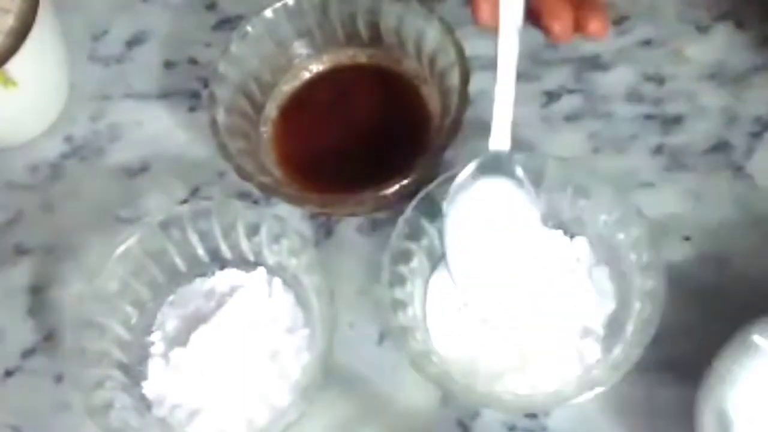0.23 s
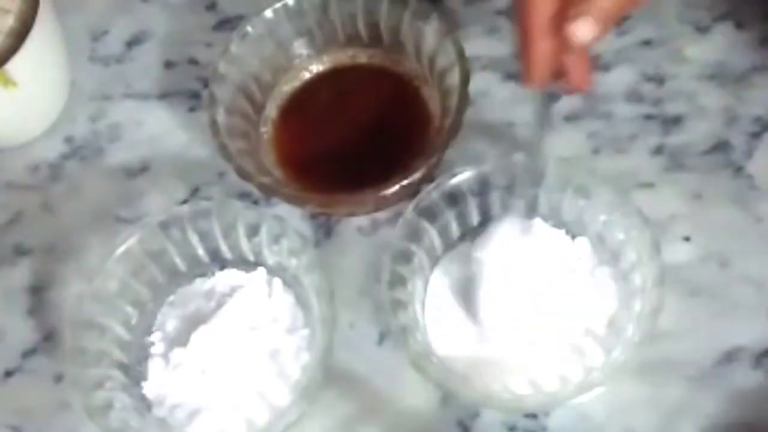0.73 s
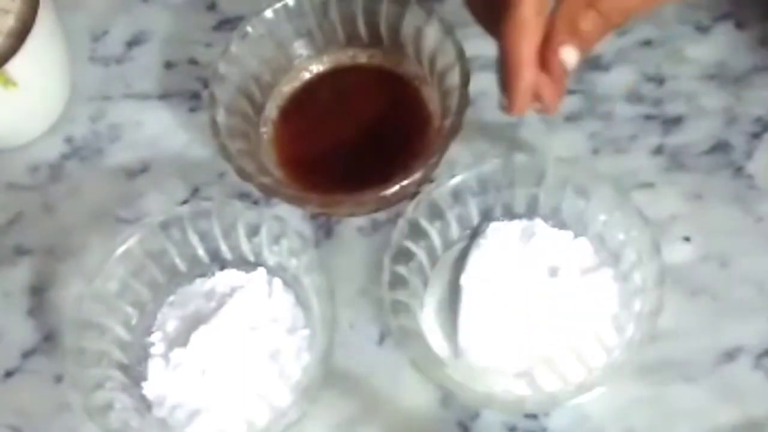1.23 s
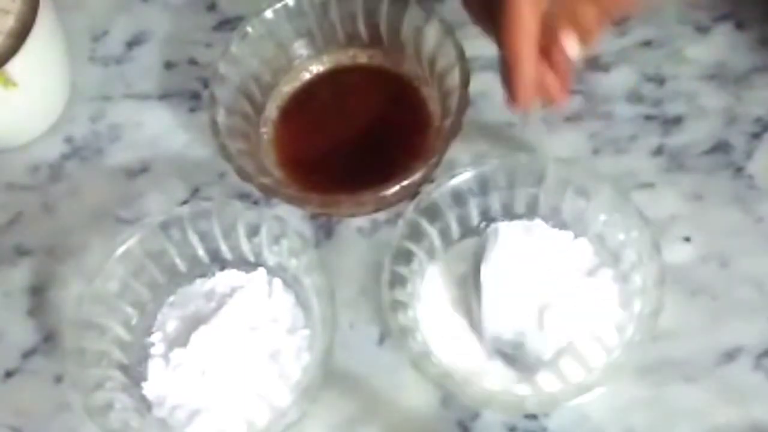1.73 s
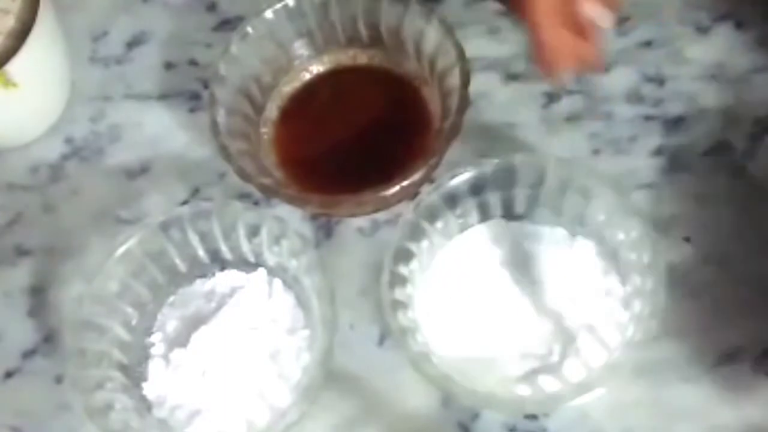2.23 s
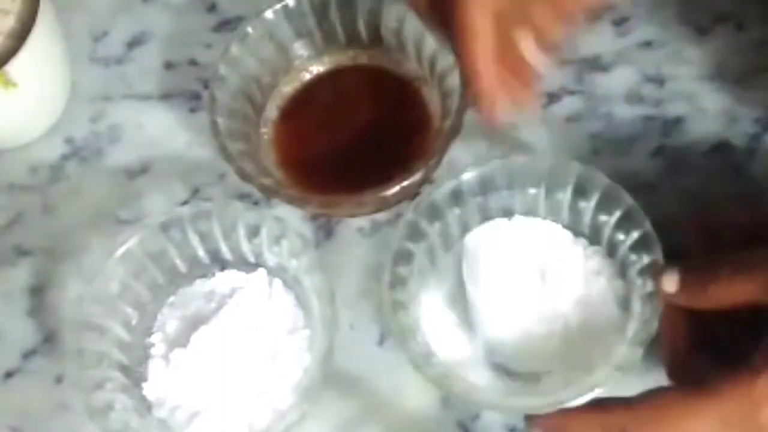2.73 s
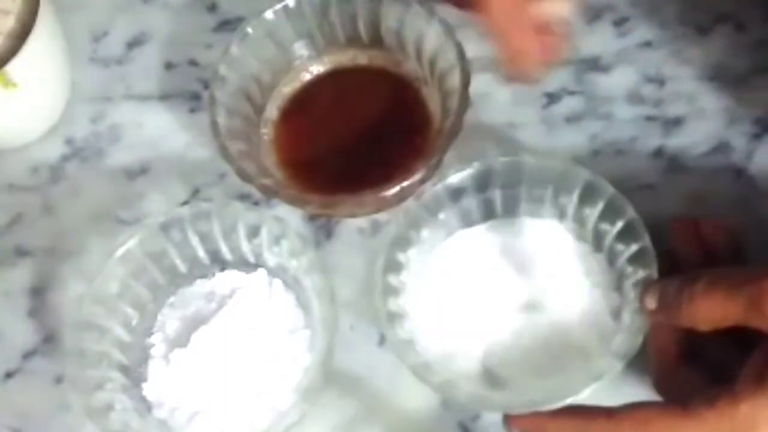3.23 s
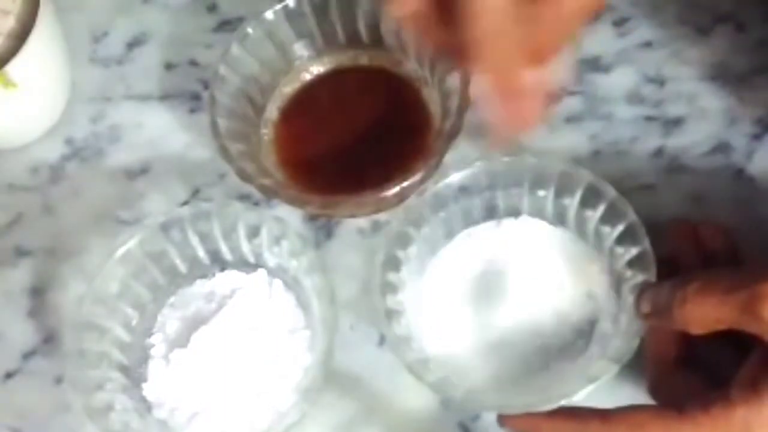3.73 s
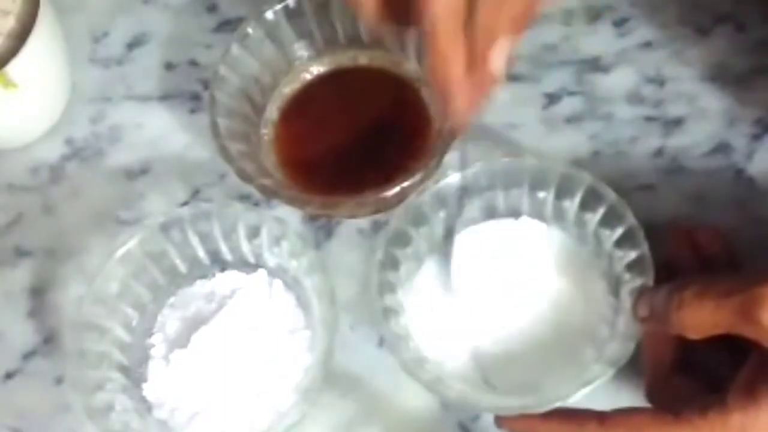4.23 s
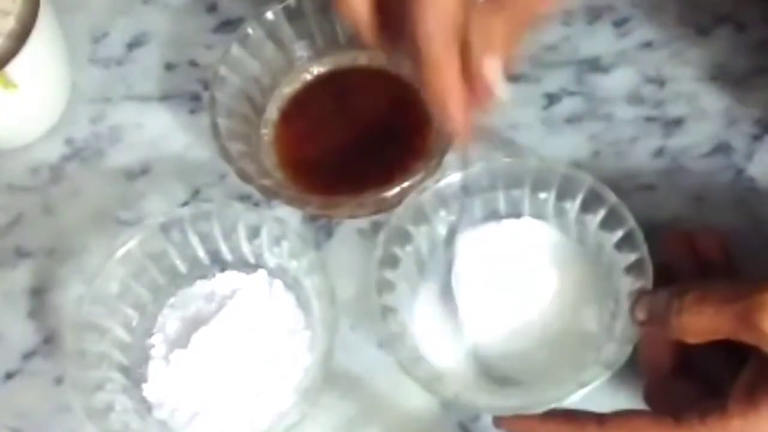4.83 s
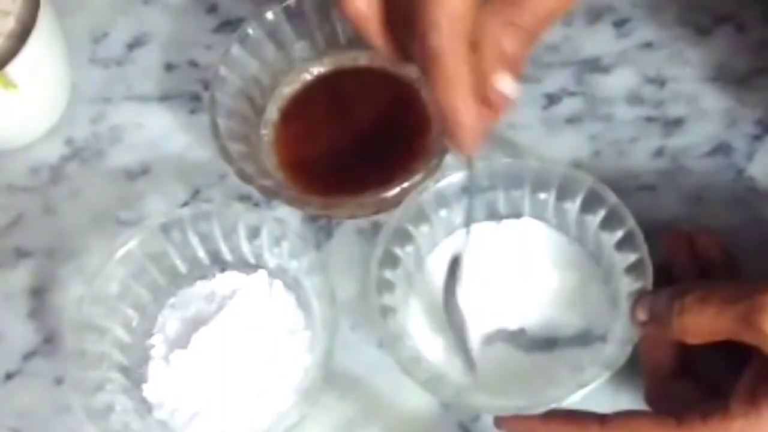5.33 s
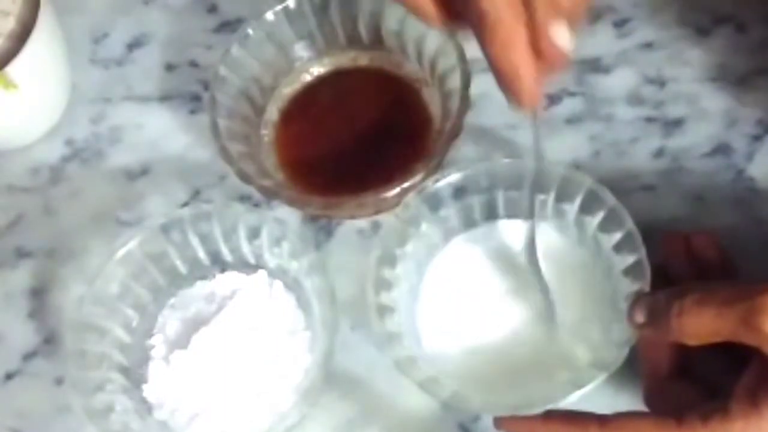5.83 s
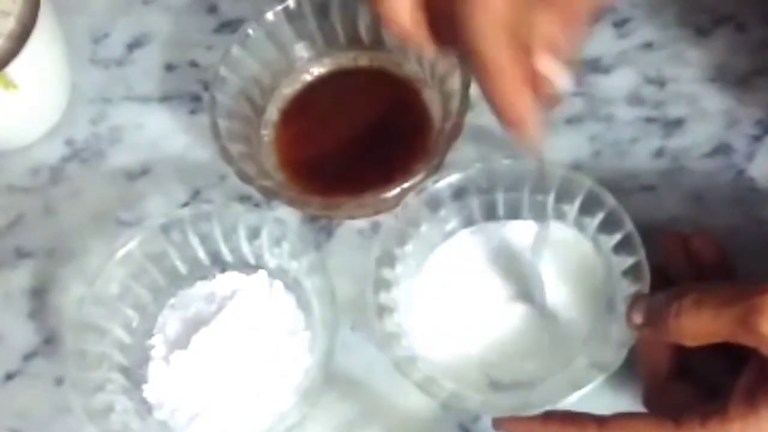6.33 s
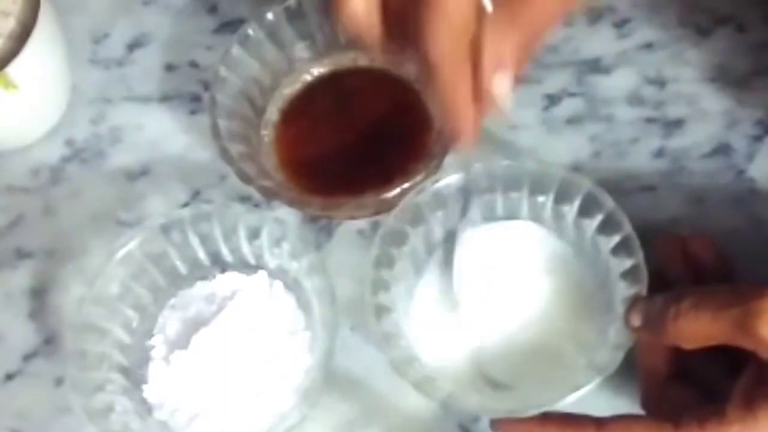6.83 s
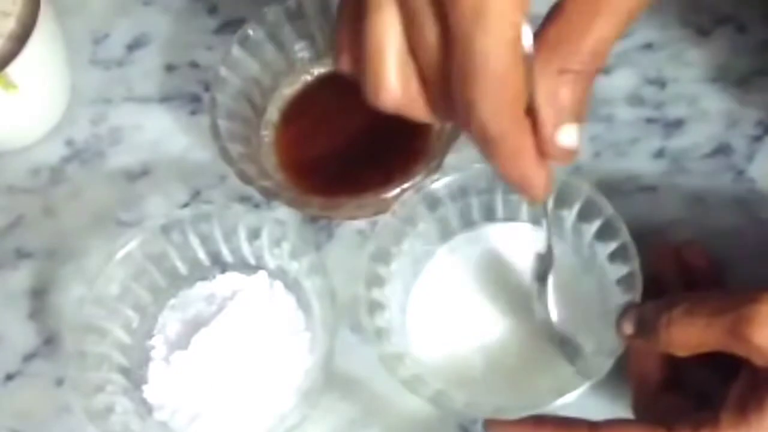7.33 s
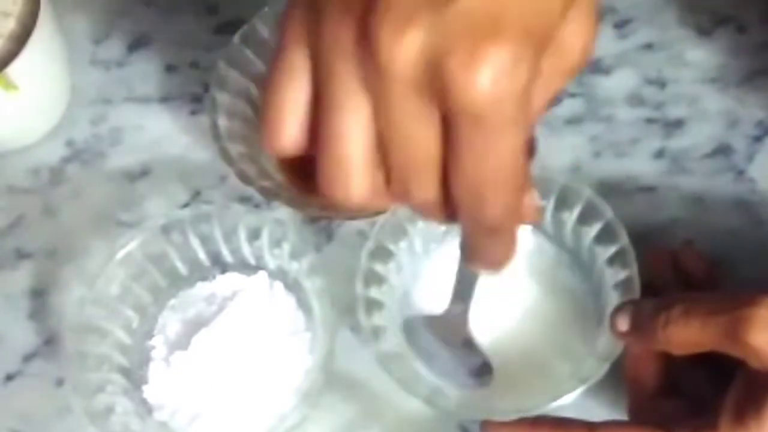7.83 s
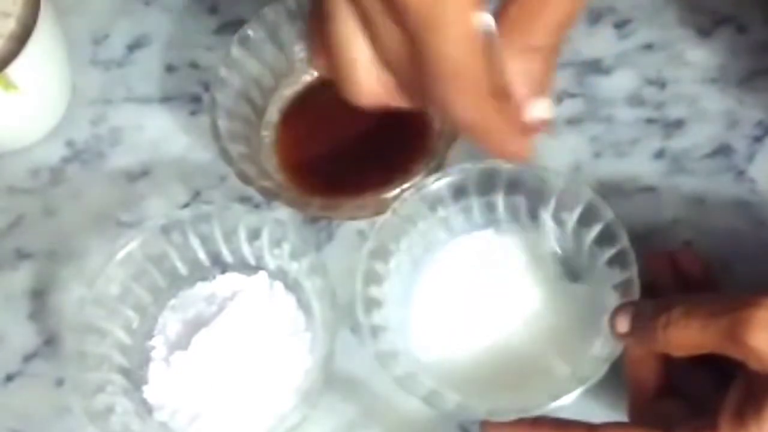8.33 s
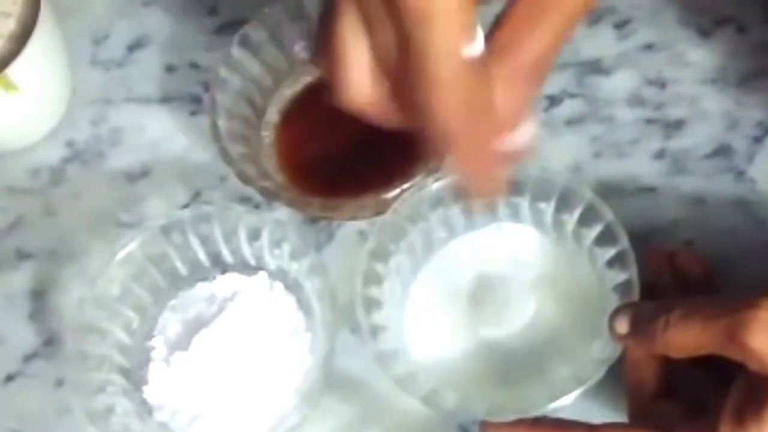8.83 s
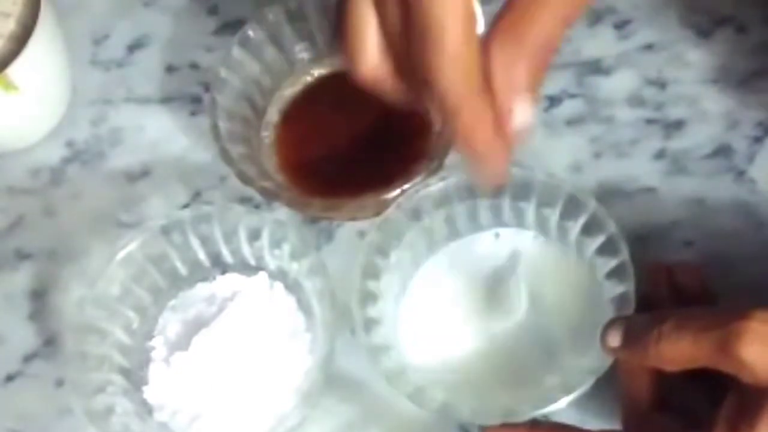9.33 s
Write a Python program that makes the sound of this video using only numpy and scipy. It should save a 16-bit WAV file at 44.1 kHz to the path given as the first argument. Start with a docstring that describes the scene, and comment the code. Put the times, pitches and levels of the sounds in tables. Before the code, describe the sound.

A metal spoon stirs thick paste in a small glass bowl, dull knocks and occasional bright clinks over a faint low hum in a kitchen.

```python
"""Stirring thick paste in a glass bowl

A steel spoon stirs a thick paste in a small glass bowl on a stone counter, in a small kitchen.
Blows on the bottom are damped low modes with a noisy splash; blows on the wall are a crack and ringing glass modes.
The drag of the spoon is clumped noise through the low modes; faint taps and bangle ticks are short bursts and rings.
Every hit gets a decaying-noise room answer. Filtered noise makes the rumble, wavering hum and hiss behind."""
import sys
import numpy as np
from scipy import signal
from scipy.fft import rfft, irfft, next_fast_len
from scipy.io import wavfile
from scipy.ndimage import map_coordinates

SR = 44100
rng = np.random.default_rng(int(sys.argv[2]) if len(sys.argv) > 2 else 0)


def voltage_ratio(decibels):
    """Convert decibels (scalar or array-like) to amplitude ratios, 20 dB per decade."""
    exponent = np.asarray(decibels, float) / 20
    return 10 ** exponent


def wrap_up_sound(samples):
    """Save the sound to the file named by the first command line argument, as 16-bit audio."""
    columns = np.atleast_2d(samples).T
    # keep every value between -1 and 1, then stretch to whole-number steps
    tamed = np.clip(columns, -1, 1)
    steps = np.round(tamed * 32767).astype(np.int16)
    wavfile.write(sys.argv[1], SR, steps)


N = 422478  # samples in the scene
HIT_LENGTH = 24576  # samples given to one hit with its room answer

# Level of the rumble before its lift and wobble: start_s, level_db
RUMBLE_LEVEL = [(0.0, -44.5), (0.69, -46.5), (1.47, -44.5), (2.35, -46), (3.71, -45.5), (4.05, -43.5),
                (6.27, -44), (6.88, -40.5), (7.6, -43.5), (7.95, -47), (9.28, -40.5), (9.58, -44.5)]
# Colour of the rumble, relative: pitch_hz, density_db (per Hz)
RUMBLE_COLOUR = [(15, -41), (30, 6.5), (70, 8), (108, -3), (162, 0.5), (208, -5), (270, -8.5), (400, -7.5),
                 (800, -38)]
# Unsteady hum tones, before they swell with the rumble: pitch_hz, width_hz, level_db
HUM_TONES = [(78.85, 5.9, -47.5), (117.8, 11.7, -52.5), (281, 7.8, -59.5), (335, 8.3, -57.5),
             (1900, 480, -61.5)]
# Level of the wavering tone near 160 Hz: start_s, level_db
UPPER_HUM_LEVEL = [(0.0, -45.5), (0.45, -52), (2.03, -57), (4.43, -55.5), (5.15, -47.5), (7.52, -53),
                   (7.84, -66), (9.28, -49.5), (9.58, -54)]
# Colour of the hiss, relative: pitch_hz, density_db (per Hz)
HISS_COLOUR = [(180, -28), (300, 0.5), (400, 5), (600, 5.5), (900, -1), (1500, -4), (2600, -6),
               (5000, -10.5), (15600, -11)]
# Spoon dragging on the bottom: start_s, level_db
DRAG_LEVEL = [(1.1, -63.5), (2.0, -56), (3.5, -63.5), (4.1, -50.5), (4.8, -51), (5.1, -63), (5.9, -61),
              (6.2, -52), (7.7, -52), (8.2, -59.5), (8.6, -50), (9.58, -46.5)]
# Modes of base, paste and counter: pitch_hz, relative_level_db, t60_s
BASE_MODES = [(205, -10, 0.066), (337.5, -9, 0.075), (392, -1, 0.1), (463, -12, 0.11), (547.5, 0.5, 0.05),
              (649, -6, 0.036), (979.4, -4.5, 0.061), (1016, -6, 0.062), (1401, -9, 0.05),
              (1458, -2.5, 0.041), (1595, -5.5, 0.052), (2200, -14.5, 0.027)]
# Level that drives each base mode: level_index (0 strength, 1 low, 2 middle)
BASE_DRIVE = [1, 1, 1, 1, 1, 1, 2, 2, 0, 0, 0, 0]
# Decay of the kitchen: pitch_hz, t60_s
ROOM_DECAY = [(300, 0.52), (1500, 0.36), (5000, 0.35), (14000, 0.23)]
# Faint dry taps before the first knock: start_s, level_db (reference for the burst's colour)
TAP_EVENTS = [(0.0493, -27.5), (0.068, -33), (0.9036, -22), (0.973, -27)]
# Ticks of a bangle on the stirring wrist: start_s, level_db (reference for the modes)
TICK_EVENTS = [(1.29, -44), (5.4819, -42), (6.1245, -49), (6.4717, -49), (6.7491, -45), (7.5592, -38),
               (7.7154, -37), (7.8271, -47)]
# Modes of the bangle: pitch_hz, relative_level_db, t60_s
BANGLE_MODES = [(11700, -1, 0.011), (12400, 4, 0.014), (13200, -3, 0.011)]
# Jolts of the filled base on the counter:
# start_s, strength_db, low_modes_db (over strength), middle_modes_db (over strength)
KNOCK_EVENTS = [(1.292, -35, 2.5, -17), (1.623, -33.5, 4.5, 5.5), (2.071, -25.5, -3, -3),
                (2.348, -19.5, -4, 0), (2.643, -34.5, -3.5, -11), (2.691, -26.5, -2.5, -6),
                (2.84, -14, -4, -14), (2.893, -33.5, 5, 9), (2.997, -23, -4, -13), (3.006, -24.5, -4.5, 7),
                (3.021, -19.5, -2, 4), (3.219, -16, -6, 3.5), (3.31, -25.5, -6, -13),
                (3.413, -38, -14, -13), (3.7, -29.5, -1, -4), (3.954, -22, 2.5, 4.5),
                (4.09, -18.5, -6.5, -2), (4.188, -35.5, -4, 1), (4.281, -21, -0.5, -15),
                (4.469, -18, -1.5, 4.5), (4.599, -18, 1.5, -3), (4.778, -23, -2, -1.5),
                (4.842, -34.5, 3.5, -17), (5.187, -33, 1, -8), (5.486, -26, 1, 2.5),
                (5.563, -24, -10.5, -5), (5.729, -38, -15, -8), (5.967, -50, 18, -11),
                (6.003, -31.5, -18, -7), (6.126, -19, -3, 2), (6.244, -21, -4.5, 1.5),
                (6.444, -30.5, -4.5, 0), (6.542, -37.5, -12, -6), (6.645, -34, -19, -1),
                (6.751, -16, -2.5, 2.5), (6.875, -15.5, -2, -3.5), (7.025, -14.5, -2, -0.5),
                (7.216, -32.5, -6, -16), (7.337, -39, 3.5, 4), (7.497, -12.5, -1.5, -8),
                (7.539, -17, 0.5, -8), (7.594, -33.5, 2, 3), (7.716, -36, -14, -14), (7.83, -40.5, 9, -8),
                (7.988, -17.5, -1, -32), (8.363, -18.5, -7, -2), (8.492, -19.5, -8.5, -16),
                (8.661, -18.5, -8, 0.5), (8.847, -18.5, -4.5, -11), (8.926, -24.5, -8, -15),
                (9.056, -35.5, 3, -19), (9.138, -14.5, -3.5, 0.5), (9.27, -15, -0.5, -4.5),
                (9.469, -18.5, -4.5, -2)]
# Blows on the bare wall:
# start_s, first_ring_db, lower_second_ring_db, second_ring_db, high_rings_db (references for the modes)
CLINK_EVENTS = [(2.8372, -9, -46, -21, -29), (3.2199, -10.5, -41, -30, -38),
                (3.9548, -9.5, -35, -33.5, -42), (4.2808, -11.5, -55, -32.5, -40.5),
                (4.6, -7.5, -53, -31, -39.5), (6.8767, -7, -54, -31, -38), (7.0248, -24, -60, -53, -59),
                (7.4106, -34.5, -60, -55, -63), (7.497, -18.5, -35, -29, -48), (7.987, -13, -33, -35, -42),
                (8.3631, -11, -42, -19, -26), (9.2693, -7, -40, -30, -31.5)]
# Modes of the glass wall: pitch_hz, relative_level_db, t60_s
GLASS_MODES = [(1942.5, -3, 0.093), (1897, -7, 0.15), (2007, -12.5, 0.079), (2095, -10, 0.018),
               (4646, 8, 0.048), (3020, -11, 0.093), (4862, 6, 0.064), (4890, 1, 0.044), (6960, -22, 0.029),
               (6740, -13, 0.023), (8430, 9.5, 0.055), (8750, 0, 0.053), (11900, 5.5, 0.033),
               (11620, 0.5, 0.024), (13600, 4, 0.026), (15070, -2, 0.056)]
# Level that drives each glass mode: level_index (0 first, 1 lower second, 2 second, 3 high)
GLASS_DRIVE = [0, 0, 0, 0, 1, 2, 2, 2, 3, 3, 3, 3, 3, 3, 3, 3]


def unit(x):
    """Scales a signal to rms 1."""
    return x / np.sqrt(np.mean(x ** 2) + 1e-20)


def along(points, hz):
    """Reads (pitch, value) points on a log pitch axis."""
    point_hz, value = np.transpose(points)
    return np.interp(np.log(hz + 1), np.log(point_hz + 1), value)


def curve(rows):
    """Joins (time, level) points into one value per sample."""
    return np.interp(np.arange(N) / SR, *np.transpose(rows))


def wobble(rate):
    """Draws a smooth random curve with this many knots a second."""
    knots = rng.standard_normal(int(N * rate / SR) + 4)
    return map_coordinates(knots, [np.arange(N) * rate / SR])


def filtered(x, response):
    """Multiplies the spectrum by a complex response of frequency."""
    size = next_fast_len(N + SR // 2)
    spectrum = rfft(x, size) * response(np.fft.rfftfreq(size, 1 / SR))
    return irfft(spectrum, size)[:N]


def noise(response):
    """Makes coloured noise of rms 1."""
    return unit(filtered(rng.standard_normal(N), response))


def hum_tone(pitch_hz, width_hz):
    """Narrow noise is heard as a tone that wavers; rms 1."""
    return noise(lambda f: 1 / (1 + ((f - pitch_hz) / width_hz * 2) ** 2))


def background():
    """Swelling low noise, narrow noise bands as hum, and the microphone's steady broadband hiss."""
    level_db = curve(RUMBLE_LEVEL)
    rumble_gain = voltage_ratio(level_db + 1.0 + 1.23 * wobble(3.344))
    rumble = rumble_gain * noise(lambda f: voltage_ratio(along(RUMBLE_COLOUR, f)))
    hum = sum(voltage_ratio(db) * hum_tone(hz, width) for hz, width, db in HUM_TONES)
    swell = voltage_ratio(level_db - level_db.mean())
    upper_hum = voltage_ratio(curve(UPPER_HUM_LEVEL)) * hum_tone(pitch_hz=160.8, width_hz=11.4)
    hiss = voltage_ratio(-51) * noise(lambda f: voltage_ratio(along(HISS_COLOUR, f)))
    return rumble + swell * hum + upper_hum + hiss


def drag_response(f):
    """Base modes broadened under the spoon; the paste stops treble, the light touch gives little bass."""
    modes = 0
    for pitch_hz, level_db, t60_s in BASE_MODES:
        damping = 1j * f * 6 / t60_s  # nearly three times as broad as a free ring
        modes = modes + voltage_ratio(level_db) * damping / (pitch_hz ** 2 - f ** 2 + damping)
    paste_cut = 1 + (f / 2100) ** 6
    bass_cut = 1 + (500 / (f + 1)) ** 2
    return modes / paste_cut / bass_cut


def dragging():
    """Clumped small slips of the spoon excite the low modes of the base."""
    clumps_db = 5 * wobble(45) + 2.5 * wobble(14)
    slips = rng.standard_normal(N) * voltage_ratio(clumps_db)
    return voltage_ratio(curve(DRAG_LEVEL)) * unit(filtered(slips, drag_response))


def crack(colour, life_s, attack_s):
    """A noise burst dies exponentially; a soft contact starts it gently."""
    t = np.arange(HIT_LENGTH // 4) / SR
    white = rfft(rng.standard_normal(len(t)))
    coloured = irfft(white * voltage_ratio(along(colour, np.fft.rfftfreq(len(t), 1 / SR))))
    return coloured * np.exp(-t / life_s) * (1 - np.exp(-t / attack_s)) ** 2


def in_kitchen(parts, wet_db):
    """Adds the room's answer, new for each hit; every frequency dies at its own speed."""
    hz, t, cells = signal.stft(rng.standard_normal(HIT_LENGTH // 2), SR, nperseg=256)
    rise = 1 - np.exp(-t / 0.00035)  # the answer starts just after the blow
    decay = voltage_ratio(-60 * t / along(ROOM_DECAY, hz)[:, None])
    tail = rfft(signal.istft(cells * rise * decay, SR, nperseg=256)[1], HIT_LENGTH)
    dry_parts = rfft(parts, HIT_LENGTH)
    wet_parts = dry_parts * tail
    # the room returns a set share of each part's energy
    balance = np.linalg.norm(dry_parts, axis=1) / np.linalg.norm(wet_parts, axis=1)
    wet_parts *= voltage_ratio(wet_db) * balance[:, None]
    return irfft((dry_parts + wet_parts).sum(0), HIT_LENGTH)


def add_hit(track, start_s, hit):
    """Lays one hit into a track at its start time."""
    track[round(start_s * SR):][:HIT_LENGTH] += hit


def taps():
    """Very short noise bursts, strongest near the glass's first ring, make faint dry taps."""
    track = np.zeros(N + HIT_LENGTH)
    for start_s, db in TAP_EVENTS:
        colour = [(1200, db - 8), (1950, db + 10.5), (2800, db - 14), (4800, db - 6.0), (14000, db - 17)]
        burst = crack(colour, life_s=0.0015, attack_s=0.00042)
        add_hit(track, start_s, in_kitchen(burst[None], wet_db=-2.5))
    return track[:N]


def ring(modes, drive, levels_db, cycles, scatter_db=1.5):
    """Dying sines, one row per mode, each built up over some cycles; strength and pitch vary by hit."""
    hz, mode_db, t60_s = np.transpose(modes)[..., None]
    t = np.arange(HIT_LENGTH // 4) / SR
    chance = rng.standard_normal((2, *hz.shape))
    gain = voltage_ratio(mode_db + np.array(levels_db)[drive][:, None] + scatter_db * chance[0])
    decay = np.exp(-np.log(1000) * t / t60_s)
    sine = np.sin(2 * np.pi * hz * (1 + 0.0042 * chance[1]) * t)
    build_up = 1 - np.exp(-t * hz / cycles)
    return gain * decay * sine * build_up


def bangle():
    """Three high, quickly dying metal modes make each small bright tick."""
    track = np.zeros(N + HIT_LENGTH)
    for start_s, level_db in TICK_EVENTS:
        tick = ring(BANGLE_MODES, [0, 0, 0], [level_db], cycles=3.5)
        add_hit(track, start_s, in_kitchen(tick, wet_db=-7))
    return track[:N]


def knocks():
    """Blows through the paste: heavily damped low modes and a splash of noise."""
    track = np.zeros(N + HIT_LENGTH)
    for start_s, strength_db, low_over_db, middle_over_db in KNOCK_EVENTS:
        low_db = strength_db + low_over_db
        levels_db = [strength_db, low_db, strength_db + middle_over_db]
        # a firm knock is -20 dB; the splash grows faster than the blow
        splash_db = -36 + 1.6 * (strength_db + 20)
        colour = [(200, low_db + 4.5), (700, low_db + 6.5), (1500, strength_db + 10.5),
                  (2800, splash_db + 5.5), (5000, splash_db - 6.5), (15000, splash_db - 13.5)]
        modes = ring(BASE_MODES, BASE_DRIVE, levels_db, cycles=2.6, scatter_db=2.5)
        splash = crack(colour, life_s=0.007, attack_s=0.0008)
        add_hit(track, start_s, in_kitchen(np.vstack([modes, splash]), wet_db=-2.5))
    return track[:N]


def clinks():
    """Steel on the bare wall: a bright crack and the ringing modes of the glass."""
    track = np.zeros(N + HIT_LENGTH)
    for start_s, *levels_db in CLINK_EVENTS:
        first_db, _, second_db, high_db = levels_db
        colour = [(300, first_db - 47), (1000, first_db - 29), (2200, first_db + 4.5),
                  (3000, second_db + 4), (5200, second_db + 8.5),
                  (8000, high_db + 6), (13000, high_db + 7.0)]
        glass = ring(GLASS_MODES, GLASS_DRIVE, levels_db, cycles=1.8)
        impact = crack(colour, life_s=0.0045, attack_s=0.000067)
        add_hit(track, start_s, in_kitchen(np.vstack([glass, impact]), wet_db=-1.0))
    return track[:N]


def scene():
    """Sums everything at one microphone."""
    return (background() + dragging() + taps() + bangle() + knocks() + clinks())[None]


def top_cut(x):
    """Nothing passes above the cut-off."""
    return signal.sosfilt(signal.butter(12, 16470, fs=SR, output="sos"), x)


def microphone_response(f):
    """Loses the deepest bass, eases the treble slightly and steps down 26 dB at 15.5 kHz."""
    bass_cut = 1 + (44 / (f + 1)) ** 8
    treble_ease = 1 + 0.02 * (f / 15000) ** 2
    top_step = np.where(f < 15500, 1, voltage_ratio(-26))
    return top_step / bass_cut / treble_ease


def record(dry):
    """The microphone shapes the mix at both ends of the spectrum."""
    mix = filtered(dry[0], microphone_response)[None]
    return top_cut(mix)


dry = scene()
out = record(dry)
wrap_up_sound(out)
```